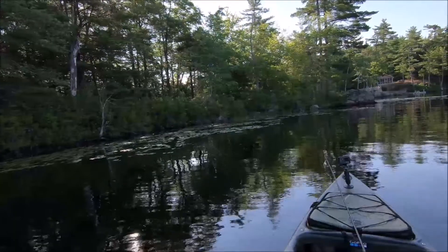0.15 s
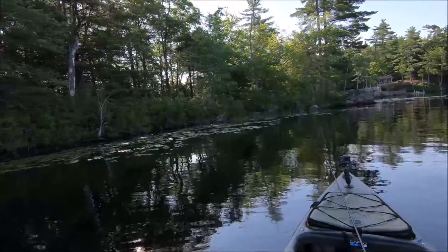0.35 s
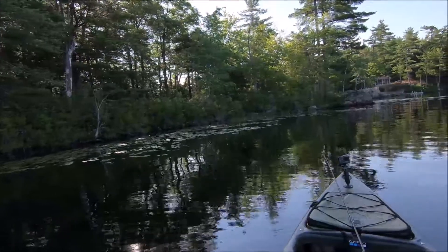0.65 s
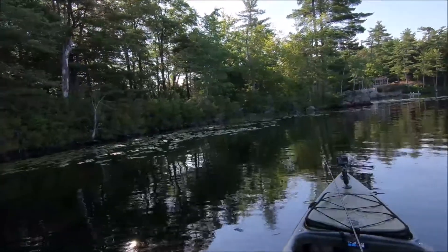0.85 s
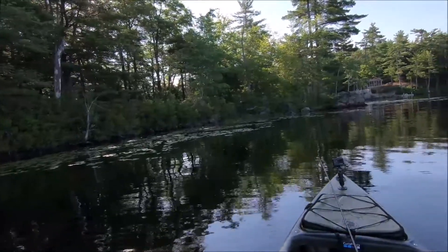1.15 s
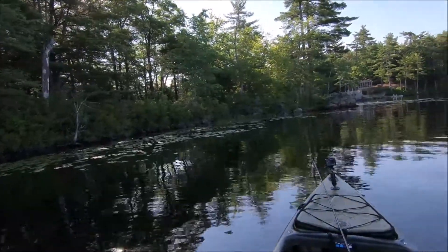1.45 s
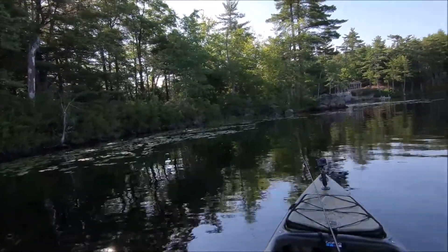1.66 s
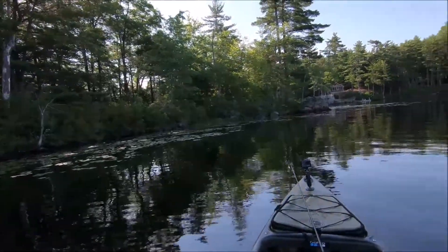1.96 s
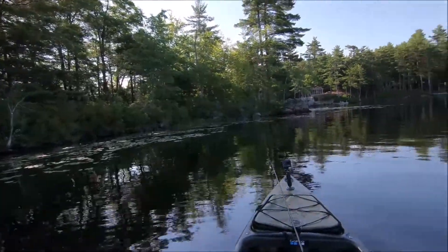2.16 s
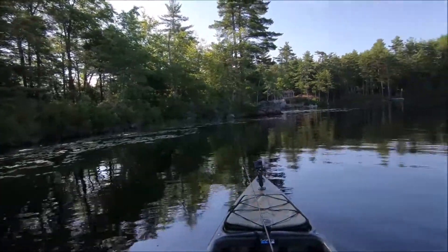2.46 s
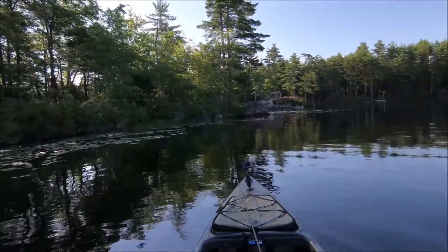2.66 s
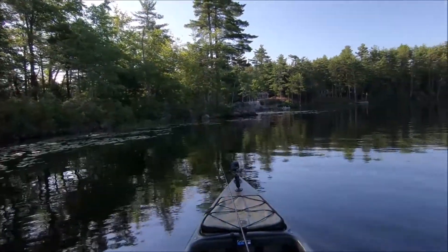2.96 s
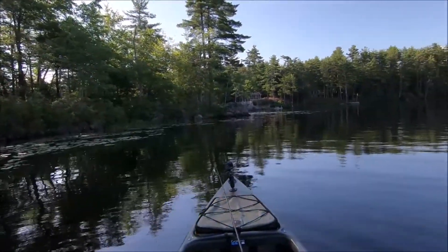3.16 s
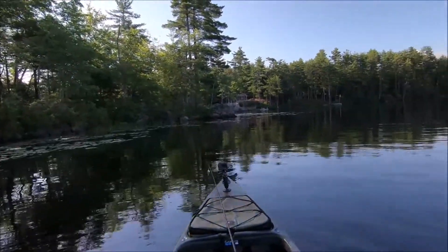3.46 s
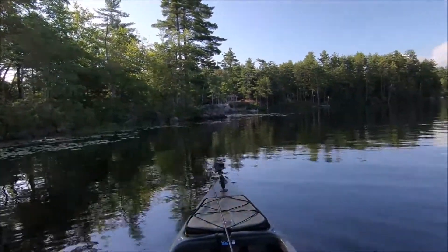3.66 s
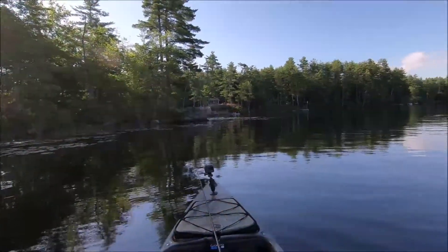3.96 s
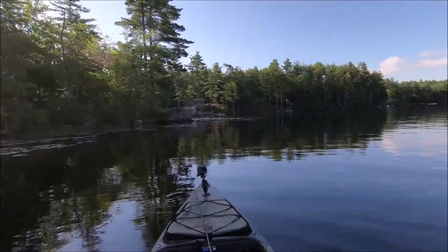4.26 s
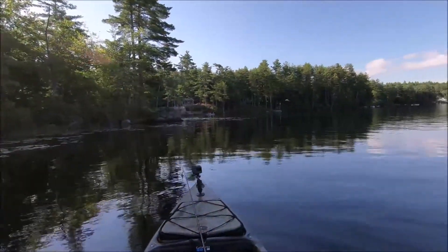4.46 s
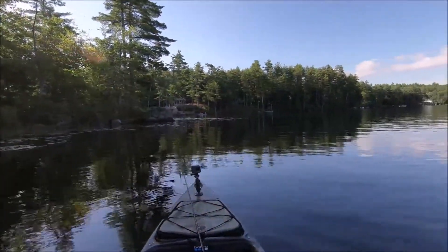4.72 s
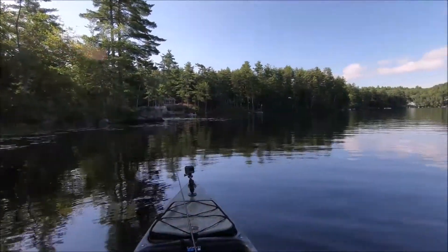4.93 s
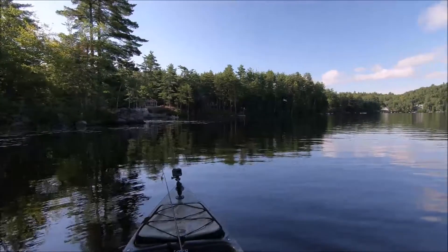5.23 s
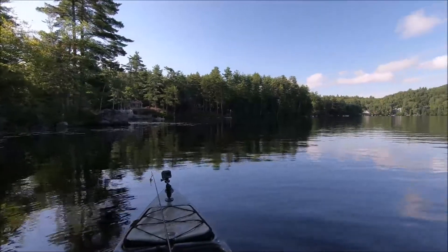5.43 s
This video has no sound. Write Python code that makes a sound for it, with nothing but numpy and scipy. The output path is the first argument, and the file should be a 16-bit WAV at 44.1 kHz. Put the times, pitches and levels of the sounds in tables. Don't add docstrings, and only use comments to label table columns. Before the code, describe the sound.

On a calm tree-lined lake, a camera on a kayak catches a loon's rapid quavering call straight away, with wind thumping the microphone. Scattered echoes fade off the shores, and a faint short bird note follows. A quiet stretch of low distant drone and soft hiss leads to a burst of water drops ticking and trickling from a paddle, thinning into scattered drips.

```python
import sys
import numpy as np
from scipy import signal
from scipy.io import wavfile
from scipy.ndimage import uniform_filter1d

SR = 44100
rng = np.random.default_rng(int(sys.argv[2]) if len(sys.argv) > 2 else 0)


def transcribe(u):
    v = np.clip(np.atleast_2d(u).T, -1, 1)
    q = np.round(v * 32767).astype(np.int16)
    wavfile.write(sys.argv[1], SR, q)


def volts(x):
    e = np.asarray(x, float) / 20
    return 10 ** e


N = 246519

# (time [s], level [dB])
DRONE_COLOUR = [(53, -35.5), (90, -29.5), (118, -26), (133, -22.5), (151, 8), (222, -4), (259, -12.5),
                (383, -12), (577, -18.5), (712, -9.5), (775, -4.5), (931, -15), (1180, -17), (1750, -26.5),
                (2600, -38.5), (3380, -78), (5720, -120)]
DRONE_SWELL = [(0, -1.5), (1, -0.5), (2, -0.5), (3, -0.5), (3.9, 2.5), (4.1, 3.5), (4.5, 0.5), (5, -2.5),
               (5.59, -6)]
# (frequency [Hz], density [dB per Hz])
HISS_COLOUR = [(590, -50.5), (1000, -39.5), (1180, -1), (1760, -27.5), (2600, 0.5), (3730, 11.5),
               (4810, -10), (6510, -19.5), (7520, -8), (9780, -31.5), (16500, -120)]
# (frequency [Hz], density [dB per Hz])
AIR_COLOUR = [(4000, -9), (6500, -6.5), (8000, -6.5), (10000, -10.5), (12000, -15), (14000, -19.5),
              (15500, -30.5), (16500, -67.5)]
# (frequency [Hz], density [dB per Hz])
SIDE_COLOUR = [(40, -13), (150, -10), (400, -15.5), (800, -15), (2000, -16), (5000, -10), (8000, -6),
               (11000, -5), (14000, 4), (16500, -52)]
# (start [s], length [s], level [dB])
WASHES = [(0, 0.75, -69), (0.668, 0.044, -67), (0.938, 0.059, -68), (1.25, 0.073, -66), (1.377, 0.32, -66),
          (1.741, 0.19, -73), (2.324, 0.066, -72), (3.026, 0.4, -70.5), (3.535, 1.43, -69),
          (4.145, 0.099, -56), (4.243, 0.16, -66.5), (4.5, 0.087, -67), (4.896, 0.26, -67.5),
          (5.476, 0.065, -68)]
# (frequency [Hz], density [dB per Hz])
RUSTLE_COLOUR = [(880, -31.5), (1500, -1), (1730, -41), (1850, -13.5), (2170, -10), (2630, -11),
                 (3070, -4.5), (3630, 5), (4630, -5.5), (6100, -7.5), (7520, -20), (9780, -45.5),
                 (16500, -120)]

# (time [s], peak [dB], frequency [Hz], length [cycles])
GUSTS = [(0.01, -43, 40, 1.5), (0.037, -43, 46, 1.7), (0.058, -33.5, 53.3, 2.4), (0.085, -26, 111, 1.5),
         (0.144, -35.5, 55, 1.8), (0.173, -30.5, 80, 1.36), (0.187, -30, 76, 1.9), (0.202, -37, 89, 1.3),
         (0.2382, -30, 55, 1.11), (0.0845, -44, 210, 2), (0.375, -44.5, 155, 5.4), (0.398, -40, 70.4, 2.8),
         (0.553, -30.5, 73, 1.83), (0.54, -46, 167, 2), (0.788, -39.5, 98.5, 1.2),
         (0.825, -38.5, 43.2, 2.2), (0.829, -40, 140, 4.3)]
# (time [s], peak [dB], frequency [Hz], length [cycles])
MORE_GUSTS = [
    (0.086, -24.5, 53, 1.2),
    (0.554, -40.5, 42, 3.9),
    (0.881, -48.5, 43.3, 2.2),
]
# (time [s], peak [dB], frequency [Hz], length [cycles])
PULLS = [
    (0.227, -27, 55, 1.18),
    (0.2, -36, 41, 1.4),
    (0.165, -39, 59, 1.5),
]
# (time of peak [s], level [dB])
PUFFS = [(0.069, -41), (.12, -52.5), (.27, -54), (0.522, -54), (.6, -56.5), (.7, -63), (.8, -52.5),
         (.87, -66), (1.09, -69), (1.44, -71), (1.62, -78), (1.949, -69), (2.25, -78), (2.51, -70),
         (2.74, -66.5), (3.01, -79), (3.2, -91), (3.62, -73), (3.82, -81), (4.37, -68), (4.56, -67),
         (4.7, -77), (5.15, -85), (5.54, -86)]
# (frequency [Hz], density [dB per Hz])
RUMBLE_COLOUR = [(10, -14), (30, 0), (60, -3), (100, -8), (160, -30), (300, -60), (700, -120)]

# (time [s], pitch [Hz], first partial [dB], second partial [dB])
FAR_NOTE = [
    (.895, 712, -70, -72),
    (.915, 715.3, -62, -59),
    (.93, 773, -54, -62.5),
    (.95, 774, -59, -55),
    (.985, 738, -64, -77),
    (1.02, 780, -85, -68),
    (1.06, 785, -88, -79),
]

# (time [s], level [dB])
SPLASH = [
    (3.64, -44.5),
    (3.716, -59.5),
    (3.824, -61),
    (4.04, -57),
    (4.15, -51.5),
    (4.258, -53.5),
    (4.348, -53.5),
    (4.588, -63),
    (4.75, -73),
]
# (frequency [Hz], density [dB per Hz])
SPLASH_COLOUR = [(600, -28), (900, -5.5), (1600, -6), (2600, -3.5), (3900, -3), (4800, -20), (6100, -8.5),
                 (7500, -45), (10000, -38), (15000, -45)]
# (time [s], peak [dB], pitch [Hz], t60 [s], tick [dB])
DRIPS = [(3.6416, -33, 1740, 0.004, 2), (3.66, -37.5, 4570, 0.01, -1), (3.81, -33, 4050, 0.011, -11),
         (3.817, -31, 3800, 0.013, -11), (3.912, -25, 3200, 0.015, 0.5), (3.9291, -23, 3170, 0.0055, -1.5),
         (3.9664, -24.5, 2980, 0.0027, -2), (4.0262, -33, 2840, 0.007, -1),
         (4.0764, -18, 2960, 0.0068, -2.5), (4.1011, -35.5, 2630, 0.016, 1),
         (4.133, -23.5, 3490, 0.022, -2), (4.137, -27.5, 3020, 0.012, 1), (4.143, -27, 3080, 0.0054, -1),
         (4.157, -29, 3150, 0.0047, -7), (4.1707, -14, 2650, 0.0058, -4), (4.1736, -35, 2900, 0.022, -1),
         (4.1765, -38, 2840, 0.03, 2), (4.18, -39, 3730, 0.018, -4), (4.1904, -20, 2550, 0.0034, -3),
         (4.195, -31, 4370, 0.0037, -5), (4.2192, -25, 3730, 0.011, 11.5), (4.249, -30, 3570, 0.012, -14),
         (4.3498, -38.5, 3140, 0.025, -2), (4.373, -32, 3420, 0.012, -3), (4.411, -31.5, 3310, 0.0093, -2),
         (4.4832, -29, 4500, 0.0042, -2), (4.54, -33, 3230, 0.0033, -3),
         (4.5873, -38.5, 4400, 0.0081, -4.5), (4.9993, -27, 3370, 0.018, 6.5), (5.02, -25, 3560, 0.0076, 4),
         (4.484, -35, 3360, 0.0076, -1), (4.48, -40, 3500, 0.004, -3)]
# (time [s], peak [dB], pitch [Hz], tick [dB])
FAINT_DRIPS = [(3.115, -56, 3900, -4.5), (3.1612, -49.5, 3730, -7), (3.3212, -50.5, 3440, 0),
               (3.49, -63.5, 3580, -1), (3.641, -43, 3520, -10), (3.711, -47, 3720, 3),
               (3.7215, -39, 3900, -13), (3.845, -45, 3870, -3), (3.87, -37.5, 4000, -11),
               (3.978, -45, 4600, -3), (3.9864, -47, 3800, -1), (4.022, -43, 4840, -3),
               (4.0695, -31, 3780, -9), (4.12, -41, 3900, -3), (4.2314, -39, 3530, -5),
               (4.244, -39, 5300, -3), (4.2637, -40.5, 4840, -1), (4.3281, -51, 3080, -5),
               (4.385, -46, 3250, 0), (4.5032, -51, 3920, -8), (4.527, -48, 2340, 3),
               (4.556, -45, 3240, -1), (4.6826, -43, 4190, -3), (4.7351, -53.5, 3070, -2),
               (4.897, -41.5, 5200, -3), (4.927, -49.5, 3280, -6), (4.9597, -49, 3380, -7),
               (5.162, -48.5, 4000, -4), (3.704, -44, 2300, -8), (3.84, -44, 2130, -5),
               (3.867, -55, 1700, -6), (4.448, -55, 1720, -10), (4.368, -44, 2310, -1),
               (4.297, -49, 1320, -11)]
# (time [s], peak [dB], pitch [Hz])
BRIGHT_DRIPS = [(3.8405, -47, 4700), (3.9197, -42, 4750), (3.945, -50, 3280), (4.001, -56, 6800),
                (4.0825, -44, 5060), (4.1005, -44, 5600), (4.106, -44, 2610), (4.139, -35, 6000),
                (4.165, -40, 5890), (4.182, -39, 5900), (4.1954, -36, 6100), (4.2216, -35, 5570),
                (4.227, -40.5, 2850), (4.2974, -45, 5250), (4.4603, -57, 6030), (4.4985, -45, 6000),
                (4.5358, -45, 5230), (4.574, -55, 6020), (4.6159, -54, 3600), (4.672, -52, 3080),
                (4.923, -57, 6260), (3.785, -61, 5460), (3.663, -42, 3500), (3.743, -53, 1760)]
# (time [s], peak [dB], pitch [Hz])
LOW_DRIPS = [(3.702, -48, 1400), (3.714, -48.5, 1314), (3.783, -42, 1490), (3.795, -35.5, 1625),
             (3.8092, -34.5, 1296), (3.8117, -39, 1870), (3.8246, -42.5, 1310), (3.834, -44, 1480),
             (3.847, -47.5, 1730), (3.926, -49, 1200), (4.019, -36, 2220), (4.1227, -43, 1002),
             (4.163, -39.5, 1900), (4.172, -43, 1740), (4.218, -44, 2100), (4.17, -35, 2140),
             (4.182, -39, 1640), (4.569, -47, 1595), (4.288, -49.5, 980), (4.368, -48, 1450),
             (4.387, -40, 2150), (4.413, -46, 1990), (4.546, -51, 2670), (4.5578, -44.5, 1690),
             (4.581, -47.5, 1700), (4.659, -52, 1760), (5.141, -59.5, 1480)]
# (time [s], pitch [Hz], level [dB])
BUBBLE = [
    (4.795, 766, -53.5),
    (4.805, 773, -55.5),
    (4.82, 1040, -55.5),
    (4.831, 1550, -50),
    (4.84, 2100, -65),
]
# (time [s], peak [dB], lowest [Hz], highest [Hz])
SNAPS = [(0.002, -44.5, 312, 1800), (0.015, -56, 5900, 6850), (-0.1, -42, 1330, 1600),
         (3.1155, -52.5, 2560, 4300), (3.1617, -56, 2510, 5000), (3.491, -51.5, 2160, 4428),
         (3.6411, -38.5, 495, 4000), (3.5, -48, 260, 790), (3.659, -62, 5076, 7500),
         (3.662, -51, 3030, 6700), (3.685, -42, 298, 780), (3.699, -56, 2200, 5000),
         (3.7215, -56, 5000, 7000), (3.835, -54, 5000, 6200), (3.847, -58, 4800, 6500),
         (3.865, -58, 4000, 6000), (3.908, -61, 2990, 6000), (3.941, -46, 5330, 6100),
         (3.969, -48, 4400, 6900), (4.1326, -59, 5600, 8700), (4.166, -43, 4300, 7200),
         (4.2194, -51, 5100, 8889), (4.22, -70, 9000, 15400), (4.2873, -39, 820, 2250),
         (4.366, -58, 900, 3200), (4.4127, -37.5, 4500, 6200), (4.49, -55, 5500, 8900),
         (4.5443, -45, 2400, 3800), (4.557, -44.5, 1500, 4200), (4.655, -65, 7300, 8800),
         (5.5, -64, 5000, 6750), (4.957, -53.5, 5000, 6540), (5, -50, 4800, 6350), (5.1, -57, 4800, 6840),
         (5.347, -53.5, 4220, 5940)]

# (start [s], dip pitch [Hz], crest pitch [Hz], fundamental [dB], third partial [dB])
QUAVERS = [
    (0, 1180, 1140, -61, -60),
    (0.042, 1089, 1250, -43.5, -60),
    (0.122, 1042, 1241, -40, -53),
    (0.204, 1054, 1276, -31.5, -60.5),
    (0.288, 1071, 1274, -32, -59),
    (0.371, 1064, 1246, -35, -63),
    (0.457, 1069, 1268, -35, -65),
    (0.543, 1042, 1146, -57, -51.5),
    (0.618, 1070, 1094, -57, -60),
]
# (second partial [dB], fourth [dB], fifth [dB], sixth [dB])
OVERTONES = [
    (0, 1.5, -11.5, -2.5),
    (0, 3, -3.5, -8),
    (0, -0.5, -5.5, -4),
    (0, 4, 1.5, -3.5),
    (0, 2, 0, -5.5),
    (0, -1.5, 0.5, -7),
    (0, 0, 2, -0.5),
    (0, 0.5, 1.5, 7),
]
# (frequency [Hz], gain
# [dB])
PARTIAL_COLOUR = [(2150, -1), (2330, -0.5), (2550, -5), (3280, -11), (3450, -1), (3720, 13), (4300, 3.5),
                  (4520, 5.5), (4820, 4.5), (5050, -11), (5500, -8), (6300, -5.5), (6560, -28.5), (6850, -29.5)]
# (time [s], side level [dB])
CALL_SIDE = [
    (0, -22),
    (.09, -17),
    (.17, -20),
    (.25, -25),
    (.33, -24.5),
    (.4, -32.5),
    (.6, -39),
]
# (frequency [Hz], t60 [s], level [dB])
SHORE = [(780, 1.1, -22), (1030, 0.86, -10.5), (1140, 0.6, -7.5), (1200, 0.66, -11), (1300, 0.6, -14.5),
         (1550, .7, -9), (2460, 0.52, -14.5), (3730, 0.45, -15.5), (4460, 0.32, -7), (6100, 0.22, -7.5),
         (6800, .15, -19)]
# (delay [s], level [dB])
NEAR_ECHOES = [
    (.019, -13),
    (.031, -11),
    (.047, -13),
    (.068, -16),
]


def read(points, hz):
    f, value = np.transpose(points)
    return np.interp(np.log(hz + 1), np.log(f + 1), value)


def evened(x):
    return x / np.sqrt(np.mean(x ** 2) + 1e-20)


def drift(n, size):
    return evened(uniform_filter1d(rng.standard_normal(n), size=size))


def curves(rows):
    s, *columns = np.transpose(rows)
    t = np.arange(s[0], s[-1], 1 / SR)
    return s[0], [np.interp(t, s, c) for c in columns]


def add(mix, s, sound):
    at = round(s * SR)
    sound = sound[max(-at, 0):]
    part = mix[max(at, 0):][:len(sound)]
    part += sound[:len(part)]


def butter(x, order, hz, kind="lowpass"):
    return signal.sosfilt(signal.butter(order, hz, kind, fs=SR, output="sos"), x)


def noise(colour, patchy_db, flicker_db, size):
    frames, hz = 4 * N // size + 5, np.fft.rfftfreq(size, 1 / SR)
    a, b, patches = rng.standard_normal((3, len(hz), frames))
    patches = uniform_filter1d(patches, size=5, axis=0)
    patches = evened(uniform_filter1d(patches, size=8, axis=1))
    level_db = read(colour, hz)[:, None] + patchy_db * patches + flicker_db * drift(frames, 3)
    z = (a + 1j * b) * volts(level_db)
    return evened(signal.istft(z, nperseg=size, noverlap=3 * size // 4)[1][:N])


def envelope_db(start, end, db, rise, fall):
    t = np.arange(0, N / SR, .005)[:, None]
    return t[:, 0], db - rise * np.maximum(start - t, 0) - fall * np.maximum(t - end, 0)


def ducking():
    duck_db, release_s = -2.5, 0.098
    since_call = np.arange(N) / SR - QUAVERS[-2][0]
    return volts(duck_db * np.clip(1 - since_call / release_s, 0, 1))


def far_drone():
    swell_db = np.interp(np.arange(N) / SR, *np.transpose(DRONE_SWELL))
    hum = noise([(60, -59.0)] + DRONE_COLOUR, patchy_db=2.0, flicker_db=-0.95, size=1024)
    return volts(-62 + swell_db) * hum


def hull_rustle():
    s, length, db = np.transpose(WASHES)
    at, washes_db = envelope_db(s, s + length, db, rise=311, fall=272)
    level = np.sqrt(volts(-75) ** 2 + (volts(washes_db) ** 2).sum(1))
    rustle = noise(RUSTLE_COLOUR, patchy_db=2.5, flicker_db=-0.06, size=256)
    return np.interp(np.arange(N) / SR, at, level) * rustle


def hisses():
    housing = volts(-81) * noise(HISS_COLOUR, patchy_db=3.0, flicker_db=2.5, size=512)
    thin = noise(AIR_COLOUR, patchy_db=1.5, flicker_db=0.4, size=512)
    return housing + volts(-85.5 + 1.4) * ducking() * thin


def wind():
    opening_db, opening_s = -35, .003
    mix = volts(opening_db) * np.exp(-np.arange(N) / SR / opening_s)
    for rows, way in [(GUSTS + MORE_GUSTS, -1), (PULLS, 1)]:
        for s, db, hz, cycles in rows:
            t = np.arange(-cycles / hz / 2, cycles / hz / 2, 1 / SR)
            add(mix, s + t[0], way * volts(db) * np.cos(2 * np.pi * hz * t) * np.hanning(len(t)))
    lumps = noise(RUMBLE_COLOUR, patchy_db=2.0, flicker_db=1.2, size=2048)
    s, db = np.transpose(PUFFS)
    t, puffs_db = envelope_db(s, s, db, rise=186, fall=163)
    calm_db = -83
    return mix + lumps * np.interp(np.arange(N) / SR, t, volts(calm_db) + volts(puffs_db.max(1)))


def wind_side(mid):
    return butter(mid, 2, [150, 1000], "bandpass") * drift(N, 2000)


def earlier_echo():
    pitch_hz, level_db, t60_s = 1332, -57, .5
    t = np.arange(SR // 2) / SR
    whistle = butter(rng.standard_normal(SR), 2, [pitch_hz - 50, pitch_hz + 50], "bandpass")
    mix = np.zeros(N)
    add(mix, 0, volts(level_db - 60 * t / t60_s) * evened(whistle[SR // 2:]))
    return mix


def far_bird():
    s, (hz, first_db, second_db) = curves(FAR_NOTE)
    turns, mix = np.cumsum(hz) / SR, np.zeros(N)
    add(mix, s, volts(first_db) * np.sin(2 * np.pi * turns) + volts(second_db) * np.sin(4 * np.pi * turns))
    return mix


def splashes():
    s, (db,) = curves(SPLASH)
    n = len(db)
    hits = rng.random(n) < 2000 / SR
    sizes = volts(4 * np.minimum(rng.exponential(1, n), 3.5)) * hits
    kind, t, out = rng.integers(0, 24, n), np.arange(300) / SR, np.zeros(n)
    for k, hz in enumerate(np.geomspace(800, 13000, num=24)):
        shape = np.exp(-t * hz / 6.1) * np.minimum(t * hz / 2, 1) ** 2
        grain = np.sin(2 * np.pi * hz * t) * shape * np.sqrt(hz * hz / 1000)
        out += volts(read(SPLASH_COLOUR, hz)) * signal.oaconvolve(sizes * (kind == k), grain)[:n]
    mix = np.zeros(N)
    add(mix, s, volts(db - 9.0) * evened(out) * signal.windows.tukey(n, .05))
    return mix


def poured_drops():
    spread = np.clip(rng.standard_normal(size=(24, 3)), -2, 2)
    return [(4.17 + .035 * a, -47 + 3 * b, 3400 * np.exp(.25 * c)) for a, b, c in spread]


def drop(db, hz, t60, tick_db, glide, wobble):
    settle, settle_s = 0.3, 0.0013
    soft_db = -12
    t = np.arange(0, t60, 1 / SR)
    settling = settle * np.clip(1 - tick_db / soft_db, .1, 1.2) * settle_s * (1 - np.exp(-t / settle_s))
    turns = hz * (.93 * t + settling + (.8 * wobble + glide / 2) * t ** 2)
    rise_cycles = 1.8 + 3 * np.clip(tick_db / soft_db, 0, 1) ** 2
    rise = np.sin(np.pi / 2 * np.minimum(t * hz / rise_cycles, 1)) ** 2
    ring = volts(db - 60 * t / t60) * rise * np.sin(2 * np.pi * turns)
    tick_shape = (t * hz / 1.45) * np.exp(1 - t * hz / 0.62 / 1.7)
    tick_level = volts(db - 11.5 + tick_db - 60 * 0.00073 / t60)
    return ring + tick_level * np.sin(2 * np.pi * 1.64 * hz * t) * tick_shape


def drips():
    faint_cycles, low_cycles = 53, 54
    low_glide = 6
    rows = [row + (0,) for row in DRIPS]
    rows += [(s, db, hz, faint_cycles / hz, tick_db, 0) for s, db, hz, tick_db in FAINT_DRIPS]
    rows += [(s, db, hz, faint_cycles / hz, None, 0) for s, db, hz in BRIGHT_DRIPS + poured_drops()]
    rows += [(s, db, hz, low_cycles / hz, None, low_glide) for s, db, hz in LOW_DRIPS]
    mix = np.zeros(N)
    for (s, db, hz, t60, tick_db, glide), wobble in zip(rows, rng.standard_normal(len(rows))):
        if tick_db is None:
            tick_db = -5.5 + 5 * np.tanh(wobble)
        add(mix, s, drop(db, hz, t60, tick_db, glide, wobble))
    s, (hz, db) = curves(BUBBLE)
    add(mix, s, volts(db) * np.sin(2 * np.pi * np.cumsum(hz) / SR))
    mix = butter(mix, 6, 6900)
    return signal.lfilter(*signal.iirnotch(2150, 4.0, SR), mix)


def snaps():
    mix, n = np.zeros(N), np.arange(2400)
    for s, db, low_hz, high_hz in SNAPS:
        grit = rng.standard_normal(2400) + 11.7 * signal.unit_impulse(2400)
        burst = grit * np.exp(-n / (120.0 + 1e9 / high_hz ** 2))
        add(mix, s, volts(db) * butter(burst, 4, [low_hz, high_hz], "bandpass"))
    return mix


def loon():
    s, dip_hz, crest_hz, first_db, third_db = np.transpose(QUAVERS)
    upper_db = -54 + 0.18 * first_db
    t = np.arange(s[0], s[-1], 1 / SR)
    place = np.interp(t, s, np.arange(len(s)))
    k, phase = place.astype(int), place % 1
    arch = np.minimum(1.1 * np.sin(np.pi * phase ** .95) ** .75, 1)
    base = np.interp(t, s, dip_hz)
    hz = uniform_filter1d(base + (crest_hz[k] - base) * arch, size=420)
    turns = np.cumsum(hz + 3.16 * drift(len(t), 500)) / SR
    favour = np.exp(-((crest_hz[k] + 10 - hz) / 56) ** 2)
    swell = np.exp(-((phase - 0.59) / 0.41) ** 2 / 2)
    first = volts(first_db[k] + 1.5) * favour * swell + volts(-48.0)
    out = uniform_filter1d(first, size=300) * np.sin(2 * np.pi * turns)
    hollow_db = -9 * uniform_filter1d(volts(first_db[k] - first_db.max()) ** .5 * favour, size=400)
    flutter_db = 3.2 * np.minimum(t / 0.23, 1.15) ** 2
    second_db, fourth_db, fifth_db, sixth_db = np.transpose(OVERTONES)
    extra_db = {2: second_db, 3: 0 * second_db, 4: fourth_db, 5: fifth_db, 6: sixth_db}
    for order in range(2, 7):
        partial_db = third_db if order % 3 == 0 else upper_db
        level_db = uniform_filter1d(partial_db[k] + extra_db[order][k], size=800)
        level_db -= .2 * np.maximum(order * hz - 6900, 0)
        level_db += hollow_db * (order in (3, 4))
        level_db += flutter_db * evened(uniform_filter1d(drift(len(t), 250), size=250))
        out += volts(level_db + read(PARTIAL_COLOUR, order * hz)) * np.sin(2 * np.pi * order * turns)
    fade = np.clip(np.minimum((t - s[0] + .002) / .009, (s[-1] - t) / .015), 0, 1)
    mix = np.zeros(N)
    add(mix, s[0], np.sqrt(2) * out * fade)
    return butter(mix, 8, 7300)


def shore(x, delay_s, slow_db):
    bank_s, bank_spread_s, bank_db = 0.916, 0.041, -26
    taps = np.zeros(3 * SR)
    at = np.arange(0, 3 * SR - 20, 20)
    taps[at + rng.integers(0, 20, len(at))] = rng.choice([-1., 1.], len(at))
    hz, t, z = signal.stft(taps, SR, nperseg=768)
    f, t60, db = np.transpose(SHORE)
    t60, db = np.interp(hz, f, t60)[:, None], np.interp(hz, f, db)[:, None]
    decay = volts(-60 * t / t60) + volts(slow_db - 60 * t / (5.0 * t60))
    decay = decay + volts(bank_db) * np.exp(-((t - bank_s) / bank_spread_s) ** 2)
    decay = decay * np.clip((t - delay_s) / 0.013, 0, 1)
    energy = np.sqrt((decay ** 2).sum(1, keepdims=True) * (t[1] - t[0]) * SR / 20)
    tail = signal.istft(z * volts(db) * decay / energy, SR, nperseg=768)[1]
    near = np.zeros(len(tail))
    for echo_s, echo_db in NEAR_ECHOES:
        near[round(echo_s * SR)] = volts(echo_db)
    tail = tail + .3 * near + butter(.7 * near, 4, 2000, "highpass")
    return signal.fftconvolve(x, tail)[:N]


def call_side(bird):
    low_call = signal.sosfiltfilt(signal.butter(4, 1600, fs=SR, output="sos"), bird)
    lean_db = np.interp(np.arange(N) / SR, *np.transpose(CALL_SIDE))
    return volts(lean_db) * low_call + volts(-26) * (bird - low_call)


def scene():
    background = far_drone() + hull_rustle() + hisses()
    water = splashes() + drips() + snaps()
    bird = loon()
    calls = bird + far_bird()
    echoes = shore(calls, delay_s=0.021, slow_db=-12)
    mid = background + wind() + earlier_echo() + water + calls + echoes
    side = volts(-96) * ducking() * noise(SIDE_COLOUR, patchy_db=2, flicker_db=2.5, size=512)
    side = side + call_side(bird) + volts(-34) * wind_side(mid)
    return np.array([mid + side, mid - side])


def top_cut(x):
    return signal.sosfilt(signal.butter(12, 15700, fs=SR, output="sos"), x)


def record(dry):
    return top_cut(dry)


dry = scene()
out = record(dry)
transcribe(out)
```